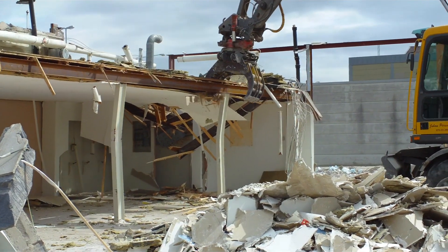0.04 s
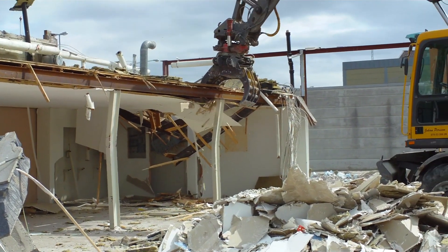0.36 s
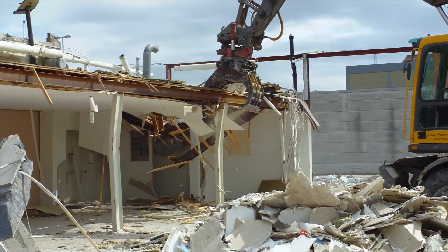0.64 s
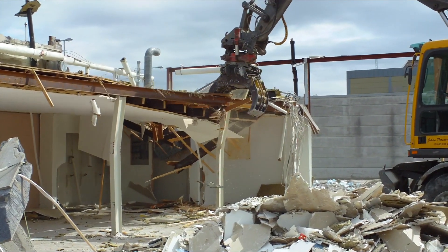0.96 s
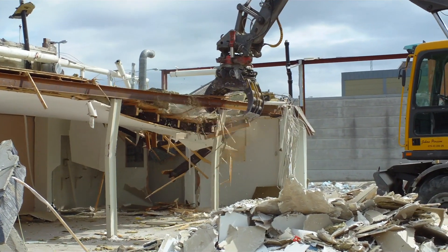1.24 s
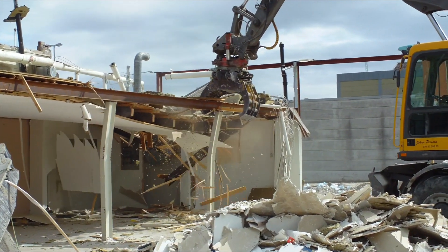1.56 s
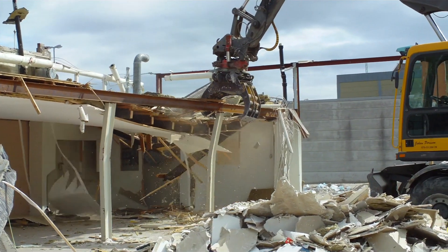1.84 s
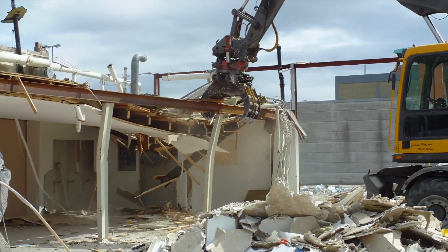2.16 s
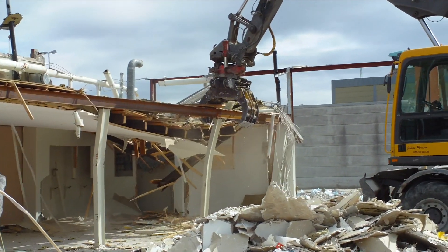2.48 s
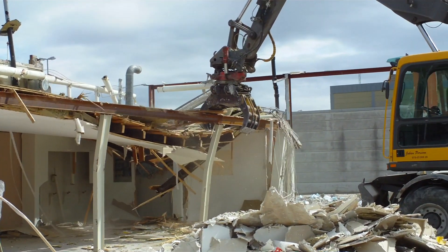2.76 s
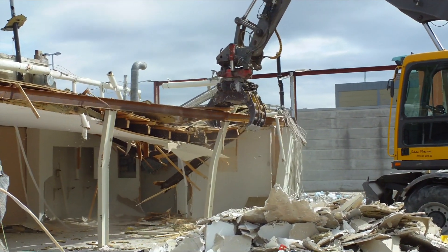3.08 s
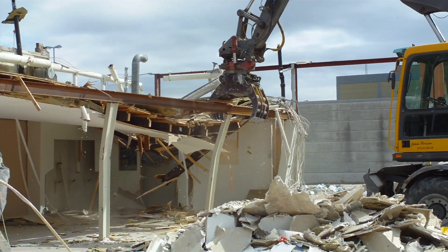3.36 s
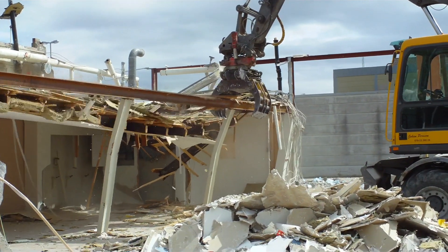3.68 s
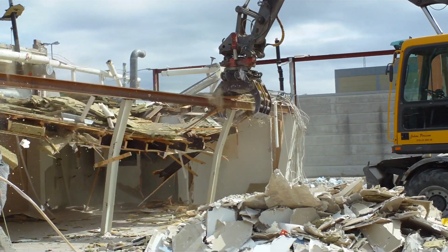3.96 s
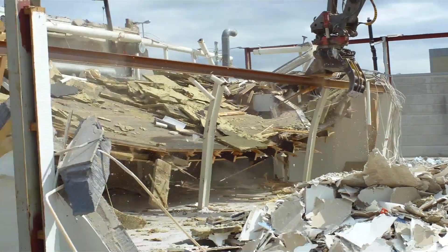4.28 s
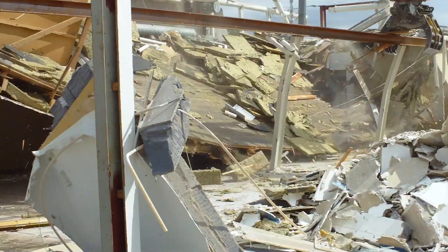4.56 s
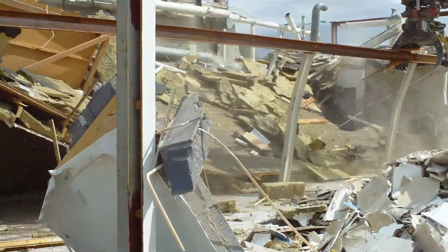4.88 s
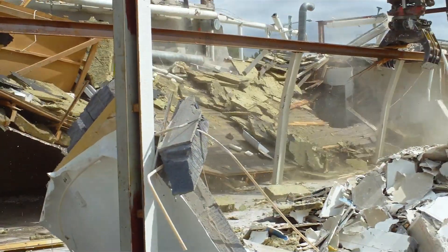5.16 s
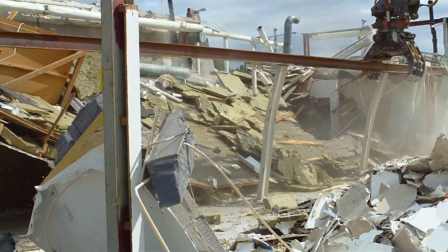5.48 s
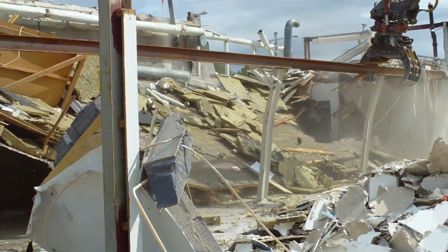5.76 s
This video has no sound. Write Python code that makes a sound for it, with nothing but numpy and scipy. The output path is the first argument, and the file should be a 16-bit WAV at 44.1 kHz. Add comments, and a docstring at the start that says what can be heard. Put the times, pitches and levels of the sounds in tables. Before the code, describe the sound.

An excavator tears down a timber roof, wood cracking and crunching over a steady diesel engine and hydraulic whine.

```python
"""Boards crunch over a running diesel and its whining hydraulic pump: an excavator tears down a timber roof.
Each pull of the grapple brings a burst of small fractures in wood and plaster. Joists crack and ring,
laths snap, heavy pieces thud and slipping panels squeak, until the roof slides down in one long collapse.
The walls of the yard return the noise of the debris as a short reverberation."""
import sys
import numpy as np
from scipy import signal
from scipy.fft import rfft, irfft
from scipy.io import wavfile
from scipy.ndimage import uniform_filter1d

SR = 44100
rng = np.random.default_rng(int(sys.argv[2]) if len(sys.argv) > 2 else 0)


def transcribe(signal):
    """Save signal, clipped to [-1, 1], as a 16-bit WAV file at the path in sys.argv[1]."""
    frames = np.atleast_2d(signal).T
    limited = np.clip(frames, -1, 1)
    pcm = np.round(limited * 32767).astype(np.int16)
    wavfile.write(sys.argv[1], SR, pcm)


N = 257103
TIME = np.arange(N) / SR

# Spectrum of the diesel. Each row: frequency in Hz, relative gain in dB.
DIESEL_SPECTRUM = [(15, -73), (25, -46), (189, -22), (270, -18), (444, -10), (731, -2.5), (823, -5),
                   (1180, -0.5), (1400, -9), (1830, -18.5), (2000, -10.5), (2400, -12), (2970, -16.5),
                   (4140, -32), (4450, -29.5), (5780, -30), (7330, -50), (9530, -89.5), (16100, -120)]
# Speed of the nine-piston pump. Each row: time in seconds, piston rate in Hz.
PISTON_RATE = [(0, 243), (0.7, 240), (1.65, 237.5), (2.6, 244), (3.1, 242.3), (5.83, 240)]
# Machine tones. Each entry: a multiple of the piston rate; one third is the firing rate.
TONE_ORDERS = [1 / 3, 1, 2, 3, 4, 6, 7]
# Strength of those tones. Each entry: rms level in dB.
TONE_LEVELS = [-68.5, -57.5, -53, -40, -45, -54.5, -49.5]
# Gear and fan tones. Each row: frequency at mean speed in Hz, rms level in dB.
GEAR_TONES = [(581, -51.5), (689, -50.5), (1180, -41), (1497, -53)]
# Pulls of the grapple. Each row: start and hold in seconds, relative crunch and crackle levels in dB.
GRAPPLE_PULLS = [(0.0, 0.059, -30, -39), (0.048, 0.12, -24, -36.5), (0.205, 0.023, -33, -35.5),
                 (0.26, 0.094, -27, -37), (0.48, 0.037, -23.5, -36), (0.734, 0.2, -28, -39),
                 (0.857, 0.28, -15.5, -24.5), (1.164, 0.14, -17, -25.5), (1.344, 0.042, -18.5, -29),
                 (1.575, 0.022, -36.5, -36.5), (1.707, 0.035, -29, -34.5), (1.823, .045, -18.5, -27.5),
                 (1.903, 0.01, -17.5, -31.5), (1.947, 0.029, -16, -40), (2.137, 0.04, -19.5, -28),
                 (2.204, 0.036, -23.5, -42), (2.292, 0.047, -19.5, -48.5), (2.383, .02, -26.5, -34.5),
                 (2.58, 0.054, -30, -37.5), (2.69, 0.088, -23.5, -35.5), (3.48, 0.076, -21.5, -39.5),
                 (3.575, 0.035, -17, -32.5), (3.628, 0.046, -20, -49.5)]
# The roof sliding down. Each row: time in seconds, relative crunch and crackle levels in dB.
ROOF_COLLAPSE = [(3.73, -24.5, -52.5), (3.85, -14, -24.5), (4.16, -17.5, -22), (4.26, -17.5, -28),
                 (4.46, -15.5, -22.5), (4.57, -26, -35.5), (4.64, -15, -24.5), (4.81, -18.5, -29.5),
                 (4.96, -17, -24), (5.14, -16.5, -27), (5.32, -21.5, -30.5), (5.83, -28.5, -35.5)]
# Spectra of the four kinds of debris. Each row: frequency in Hz, relative gain in dB.
BOARD_SPECTRUM = [(150, -48.5), (250, -21), (324, -13.5), (435, -17.5), (532, -7.5), (732, -3.5), (916, -5),
                  (1150, 2.5), (1350, -1), (1820, -6), (2170, -1), (2750, -12), (3090, -18.5), (3650, -28),
                  (4200, -26), (5460, -50), (9240, -120)]
SPLINTER_SPECTRUM = [(1530, -44), (2600, -0.5), (3090, -2), (3650, -6.5), (4150, -9.5), (4880, 0),
                     (6490, -8.5), (6840, -12.5), (7330, -23), (9530, -55.5), (16100, -120)]
JOIST_SPECTRUM = [(40, -68), (150, -38), (400, -19.5), (600, -2), (1300, -3), (1700, -8.5), (2300, -4.5),
                  (3000, -18), (4200, -29), (7000, -43.5)]
THUD_SPECTRUM = [(15, -61), (25, -44.5), (110, -20), (177, -8.5), (274, -5.5), (325, 1.5), (371, 2),
                 (450, 0.5), (580, -20.5), (990, -120)]
# Joists breaking. Each row: time in seconds, relative level in dB, pitch in Hz, weight of the snap in dB.
JOIST_BREAKS = [(0.062, -14, 826, -26), (0.084, -10.5, 799, -24.5), (0.127, -8, 996, -32),
                (0.145, -9.5, 1360, -36), (0.491, -16, 1340, -19), (0.868, -9.5, 1040, -23),
                (0.878, -3.5, 1070, -21), (0.933, -4.5, 1200, -19), (0.948, -7, 1030, -22),
                (1.046, -6.5, 1070, -8.5), (1.089, -5.5, 1140, -11.5), (1.286, -3.5, 770, -18),
                (1.833, -10, 790, -19), (1.853, -10, 993, -15), (1.919, 1, 1090, -18.5),
                (1.974, -4, 1180, -24.5), (2.112, -10, 1350, -17.5), (2.156, -3, 972, -29),
                (2.321, -3, 1060, -35), (2.329, -7.5, 1210, -39), (2.361, -7, 1060, -34),
                (2.607, -8.5, 1140, -19), (2.743, -11, 778, -18), (2.772, -10.5, 775, -24),
                (3.478, -10, 719, -27.5), (3.527, -8, 743, -31), (3.57, -6.5, 708, -12),
                (3.601, -4, 825, -22), (3.61, 0, 1090, -20), (3.662, -3, 743, -33),
                (3.685, -2.5, 1300, -34), (3.716, -3, 1310, -39), (3.992, -5.5, 1140, -7.5),
                (4.017, -14, 1080, -21), (4.162, -6, 708, -14), (4.215, -3, 630, -21),
                (4.302, -4, 713, -12.5), (4.424, -3.5, 1160, -20), (4.45, -7, 810, -24),
                (4.519, -3, 703, -28), (4.621, -7, 665, -32), (4.638, -6.5, 1130, -15),
                (4.871, -5.5, 1520, -26), (5.408, -6.5, 966, -17), (5.618, -7.5, 1210, -38),
                (5.647, -11.5, 1220, -9), (5.794, -11.5, 1130, -33)]
# Thin laths breaking. Each row: start in seconds, relative level in dB.
LATH_BREAKS = [(0.208, -18.5), (0.407, -27), (0.4938, -22), (0.8003, -28), (1.8328, -19), (2.15, -16.5),
               (2.793, -18.5), (3.5704, -20.5), (4.0233, -9), (4.0383, -11), (4.0626, -14), (4.1635, -10.5),
               (4.4513, -14), (4.9045, -21.5), (5.4735, -13), (5.6082, -14)]
# Heavy pieces landing. Each row: start in seconds, hold in seconds, level in dB.
HEAVY_LANDINGS = [(0.887, 0.26, -44.5), (1.027, 0.035, -35.5), (1.274, 0.058, -35), (1.91, 0.028, -48.5),
                  (2.19, 0.09, -48), (2.712, 0.059, -41), (3.485, 0.089, -42.5), (3.575, 0.038, -34.5),
                  (3.78, 0.59, -39.5), (4.157, 0.11, -36.5), (4.496, 0.031, -30), (4.593, .1, -34.5),
                  (4.731, .07, -32.5), (4.87, 0.21, -43), (5.15, 0.37, -49)]
# Pieces slipping. Each row: start in seconds, level in dB, pitch and bandwidth in Hz, length in seconds.
SLIP_STROKES = [(1.357, -15.5, 2390, 170, 0.02), (2.30, -17, 1120, 600, 0.092),
                (2.303, -22.5, 2040, 800, 0.061), (2.392, -30.5, 5330, 700, 0.045),
                (3.679, -17, 784, 121, 0.03), (3.715, -10.5, 780, 107, 0.025),
                (4.42, -14.5, 2460, 596, 0.0093), (4.888, -20, 5210, 1290, 0.13),
                (5.349, -18, 1320, 100, 0.026), (5.405, -22.5, 904, 91.5, 0.021),
                (5.416, -20, 723, 80, 0.022), (5.618, -19.5, 1206, 69.4, 0.025),
                (5.626, -20.5, 1790, 101, 0.017), (5.639, -27, 1140, 70, 0.014)]
# Reverberation of the yard. Each row: frequency in Hz, time to decay by 60 dB in seconds.
YARD_T60 = [(100, 0.73), (700, 0.56), (2000, 0.46), (7000, 0.28)]


def amp(db):
    """Converts decibels to an amplitude ratio."""
    return 10 ** (np.asarray(db) / 20)


def unit(x):
    """Normalises to rms 1."""
    return x / np.sqrt(np.mean(x ** 2) + 1e-20)


def peaked(x, size=176):
    """Normalises a transient so that its loudest 4 ms have rms 1."""
    return x / np.sqrt(uniform_filter1d(x ** 2, size).max() + 1e-20)


def steady(x, size=1800):
    """Division by the running rms evens out the slow level and leaves the fine texture."""
    power = uniform_filter1d(uniform_filter1d(x ** 2, size), size)
    return x / np.sqrt(abs(power) + 1e-20)


def at_frequency(points, hz):
    """Interpolates a table on a log-frequency axis."""
    f, value = np.transpose(points)
    return np.interp(np.log(hz + 1), np.log(f + 1), value)


def curve(rows, column):
    """Interpolates one column of a table in time."""
    rows = np.asarray(rows)
    return np.interp(TIME, rows[:, 0], rows[:, column])


def add(mix, start, sound):
    """Superposes a sound on the mix at a start in seconds."""
    part = mix[max(round(start * SR), 0):][:len(sound)]
    part += sound[:len(part)]


def drift(hz):
    """Low-passed noise gives a slow random fluctuation of rms 1."""
    rolloff = 1 + (np.fft.rfftfreq(N, 1 / SR) / hz) ** 4
    return unit(irfft(rfft(rng.standard_normal(N)) / rolloff, N))


def colour(x, spectrum, size=4096):
    """A minimum-phase filter imposes a spectrum and keeps attacks sharp."""
    gain_db = at_frequency(spectrum, abs(np.fft.fftfreq(size, 1 / SR)))
    log_gain = np.log(amp(np.maximum(gain_db, -100)))
    taps = np.fft.ifft(np.exp(np.conj(signal.hilbert(log_gain)))).real
    return signal.oaconvolve(x, taps[:size // 2])[:len(x)]


def resonate(x, hz, width_hz):
    """A second-order resonance with a peak gain of 1."""
    return signal.lfilter(*signal.iirpeak(hz, hz / width_hz, fs=SR), x)


def burst(start, hold_s, attack_s, fade_db_per_s):
    """An envelope with a linear attack, a hold and an exponential decay."""
    age = TIME - start
    return np.clip(age / attack_s, 0, 1) * amp(-fade_db_per_s * np.maximum(age - hold_s, 0))


def fragments(low_hz, high_hz, per_s, spread_db, cycles, tick, size):
    """A Poisson process of breaking pieces, each a tick and a damped ring; most are small, few large."""
    t, out = np.arange(size) / SR, np.zeros(N)
    chance, strength, pitch = rng.random((3, N))
    grit = rng.standard_normal(N + size)
    onsets = np.flatnonzero(chance < per_s / SR)
    at = onsets[:, None]
    hz = low_hz * (high_hz / low_hz) ** pitch[at]
    rings = np.sign(grit[at]) * np.sin(2 * np.pi * hz * t) * np.exp(-t * hz / cycles)
    ticks = grit[at + np.arange(size)] * np.exp(-t / 0.00077)
    gains = amp(spread_db * np.minimum(-np.log(strength[at]), 4))
    for onset, piece in zip(onsets, gains * (unit(rings) + tick * unit(ticks))):
        add(out, onset / SR, piece)
    return out


def excavator():
    """Rotation modulates the diesel noise once a shaft turn and sets the pitch of pump and gear tones."""
    piston_hz = curve(PISTON_RATE, column=1)
    strokes = np.cumsum(piston_hz * (1 + 0.0025 * drift(hz=16))) / SR
    shaft_turns = strokes / 9
    speed = piston_hz / piston_hz.mean()
    throb = 1 + 0.068 * np.cos(2 * np.pi * shaft_turns)
    clatter = unit(colour(rng.standard_normal(N), DIESEL_SPECTRUM)) * throb
    whine = gears = 0
    for order, db in zip(TONE_ORDERS, TONE_LEVELS):
        whine += amp(db + 0.91 * drift(hz=7.4)) * np.sin(2 * np.pi * order * strokes)
    for hz, db in GEAR_TONES:
        cycles = np.cumsum(hz * speed * (1 + 0.0044 * drift(hz=25))) / SR
        gears += amp(db + 3 * drift(hz=8.2)) * np.sin(2 * np.pi * cycles)
    return amp(-33) * clatter + np.sqrt(2) * (whine + gears)


def tearing(column, fade_db_per_s, attack_s=0.013, collapse_onset_s=0.03):
    """Incoherent sources add in power, giving the envelope of crunch (column 1) or crackle (column 2)."""
    onset = np.clip((TIME - ROOF_COLLAPSE[0][0]) / collapse_onset_s, 0, 1)
    power = (amp(curve(ROOF_COLLAPSE, column)) * onset) ** 2
    for start, hold_s, *levels_db in GRAPPLE_PULLS:
        tear = burst(start, hold_s, attack_s, fade_db_per_s)
        trickle = amp(-12) * burst(start, hold_s, attack_s, fade_db_per_s=22)  # loose bits fall
        power += amp(levels_db[column - 1]) ** 2 * (tear ** 2 + trickle ** 2)
    return np.sqrt(power)


def boards(crunch):
    """Heavily damped fractures merge into a crunch as wood fibres and plasterboard give way in clumps."""
    grains = fragments(451.3, 3295, per_s=1300, spread_db=2.5, cycles=4.5, tick=1.11, size=900)
    clumps = amp(-2 + drift(hz=25))
    return clumps * crunch * steady(colour(grains, BOARD_SPECTRUM))


def splinters(crackle):
    """Small splinters, plaster and glass have high, lightly damped modes, heard together as a crackle."""
    grains = fragments(2797, 7000, per_s=1300, spread_db=2.0, cycles=76, tick=0.75, size=700)
    return amp(-1.23) * crackle * steady(colour(grains, SPLINTER_SPECTRUM))


def joist_cracks(size=6000, lead_size=900, build_db_per_s=5000, wood_t60=0.048, snap_t60=0.025):
    """A swelling run of fibre failures excites a joist's resonance, with a bright snap on top."""
    t, out = (np.arange(size) - lead_size) / SR, np.zeros(N)
    before, after = np.maximum(-t, 0), np.maximum(t, 0)
    for break_s, db, hz, snap_db in JOIST_BREAKS:
        fibres = rng.standard_normal((2, size)) * amp(2.1 * rng.standard_normal((2, size)))
        fibres *= amp(-build_db_per_s * before)
        wood = colour(fibres[0] * amp(-60 * after / wood_t60), JOIST_SPECTRUM)
        body = peaked(0.26 * wood + resonate(wood, hz, width_hz=226))
        snap = peaked(colour(fibres[1] * amp(-60 * after / snap_t60), SPLINTER_SPECTRUM))
        add(out, break_s + t[0], amp(db - 8) * (body + amp(snap_db + 1.5) * snap))
    return out


def lath_snaps(size=4000, t60=0.016):
    """Brittle fracture of a dry lath radiates a short, bright tick."""
    t, out = np.arange(size) / SR, np.zeros(N)
    for start, db in LATH_BREAKS:
        tick = colour(rng.standard_normal(size) * amp(-60 * t / t60), SPLINTER_SPECTRUM)
        add(out, start, amp(db - 4.5) * peaked(tick))
    return out


def heavy_pieces(crunch, thump_db=-28.5):
    """Impact excites the low modes of beams and slabs; every crunch carries a little of the same thud."""
    grains = fragments(45, 420, per_s=350, spread_db=2.0, cycles=4.8, tick=2.0, size=1400)
    power = (amp(thump_db) * crunch) ** 2
    for start, hold_s, db in HEAVY_LANDINGS:
        power += (amp(db) * burst(start, hold_s, attack_s=0.018, fade_db_per_s=136)) ** 2
    return np.sqrt(power) * steady(colour(grains, THUD_SPECTRUM))


def slips(size=9000):
    """Friction of sheet metal, panels and grit drives a resonance: a narrow one sings, a wide one rasps."""
    t, out = np.arange(size) / SR, np.zeros(N)
    for start, db, hz, width_hz, length_s in SLIP_STROKES:
        friction = rng.standard_normal(2 * size)
        rub = resonate(resonate(friction, hz, width_hz), hz, width_hz)[size:]  # steady state only
        stroke = np.sin(np.pi * np.clip(t / length_s, 0, 1))
        add(out, start, amp(db) * peaked(steady(rub, size=400) * stroke))
    return out


def yard_echoes(x, size=32768, echoes_per_s=2500, first_echo_s=0.006):
    """Scattering from walls and rubble builds a diffuse reverberation whose treble decays first."""
    echoes = rng.standard_normal(size) * (rng.random(size) < echoes_per_s / SR)
    echoes *= np.arange(size) / SR > first_echo_s
    hz, t, spectra = signal.stft(echoes, SR, nperseg=256)
    decay = amp(-60 * t / at_frequency(YARD_T60, hz)[:, None])
    tail = signal.istft(spectra * decay, SR, nperseg=256)[1]
    return signal.fftconvolve(x, tail / np.linalg.norm(tail))[:N]


def scene():
    """Superposition of the debris, its echoes and the running machine in one channel."""
    crunch = tearing(column=1, fade_db_per_s=150)
    crackle = tearing(column=2, fade_db_per_s=136.5)
    debris = boards(crunch) + splinters(crackle) + heavy_pieces(crunch)
    hits = joist_cracks() + lath_snaps() + slips()
    echoes = yard_echoes(amp(-10.5) * debris + amp(-3.5) * hits)
    return (debris + hits + echoes + excavator())[None]


def record(dry, cutoff_hz=7250):
    """Soft saturation rounds the loudest peaks; a low-pass filter then limits the band."""
    rounded = dry / (1 + dry ** 6) ** (1 / 6)
    lowpass = signal.firwin(301, cutoff_hz, window=("kaiser", 8), fs=SR)
    return signal.oaconvolve(rounded, lowpass[None], "same")


dry = scene()
out = record(dry)
transcribe(out)
```